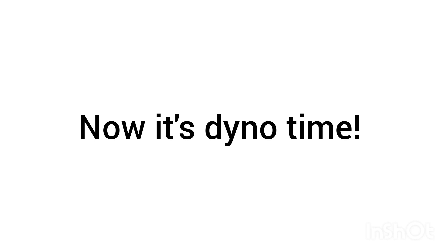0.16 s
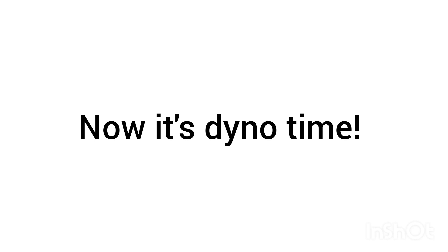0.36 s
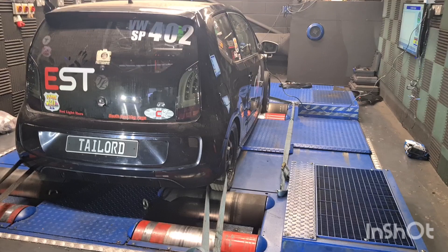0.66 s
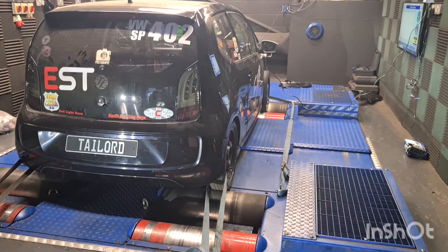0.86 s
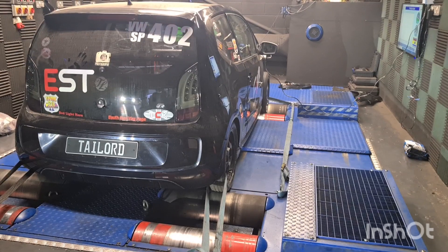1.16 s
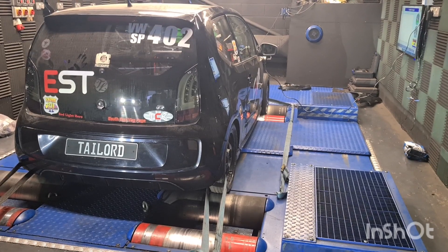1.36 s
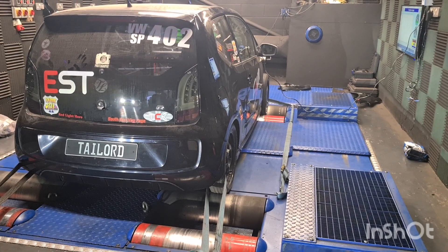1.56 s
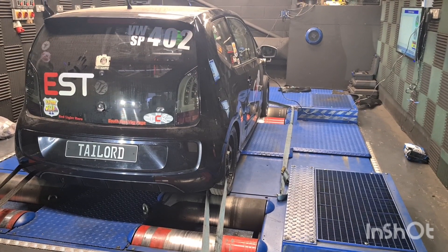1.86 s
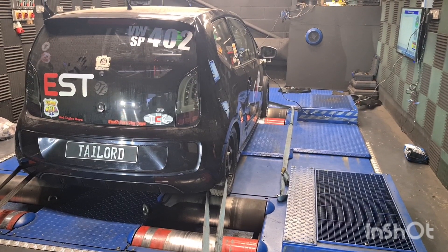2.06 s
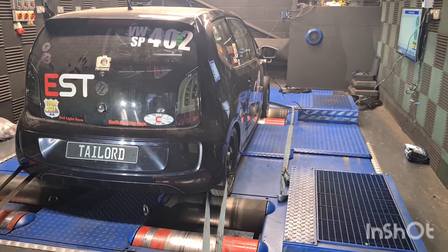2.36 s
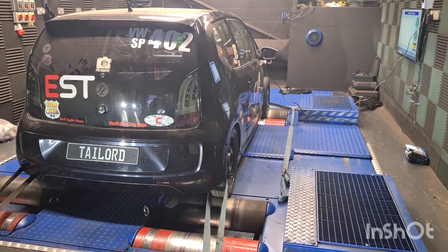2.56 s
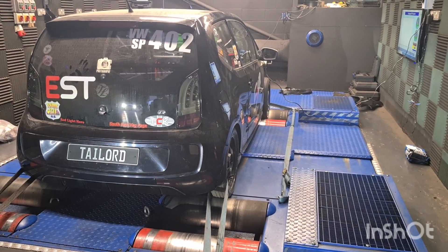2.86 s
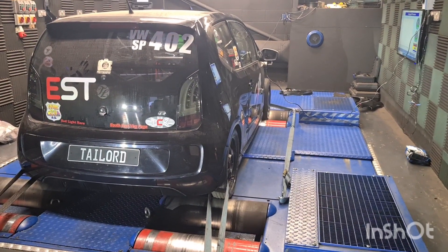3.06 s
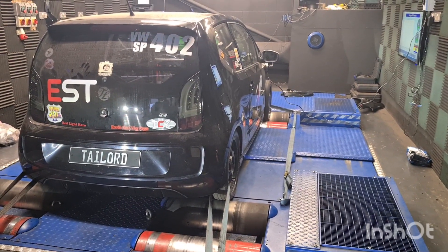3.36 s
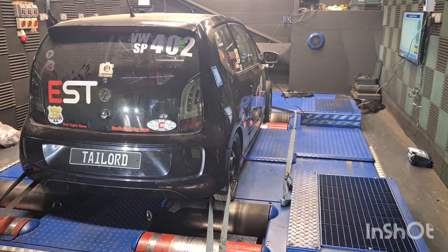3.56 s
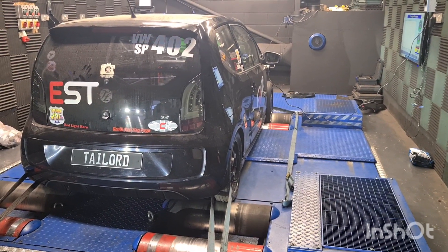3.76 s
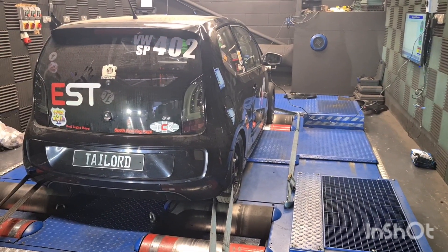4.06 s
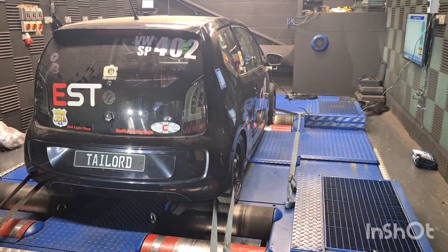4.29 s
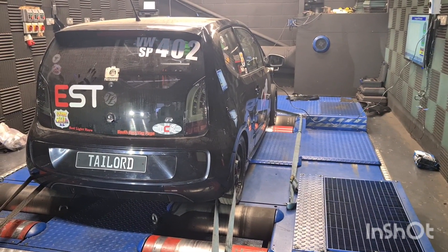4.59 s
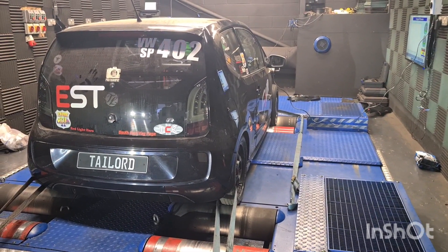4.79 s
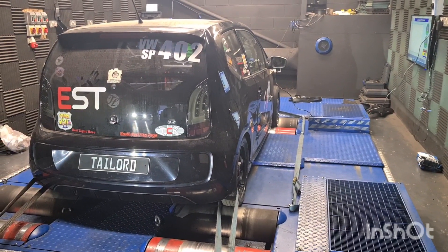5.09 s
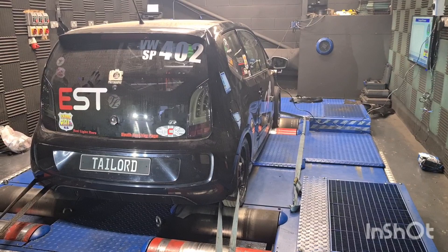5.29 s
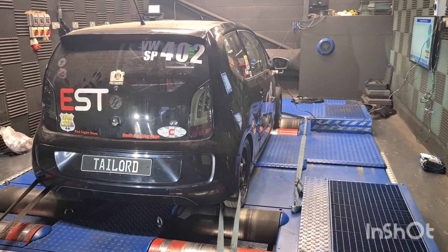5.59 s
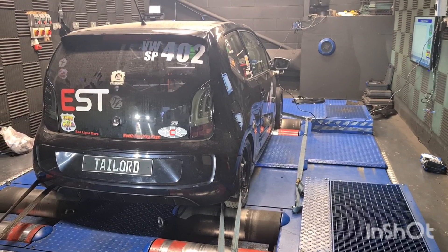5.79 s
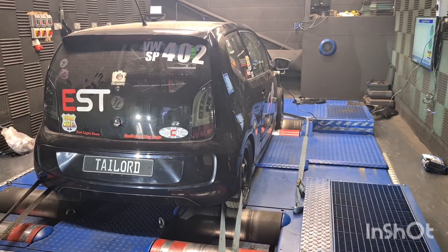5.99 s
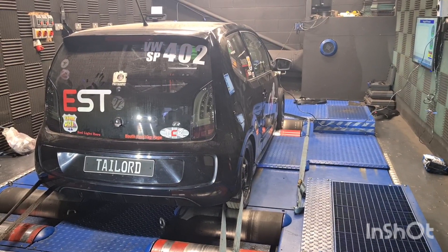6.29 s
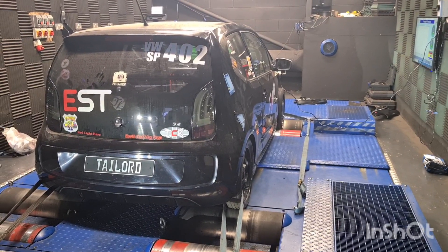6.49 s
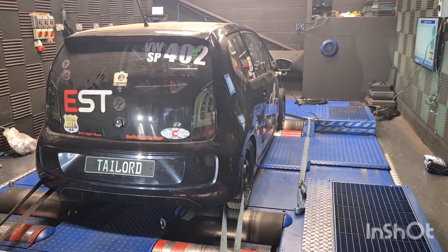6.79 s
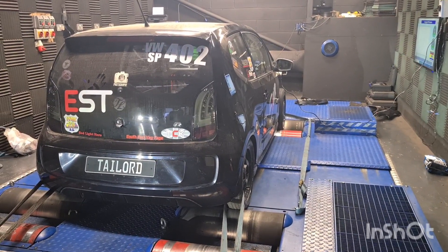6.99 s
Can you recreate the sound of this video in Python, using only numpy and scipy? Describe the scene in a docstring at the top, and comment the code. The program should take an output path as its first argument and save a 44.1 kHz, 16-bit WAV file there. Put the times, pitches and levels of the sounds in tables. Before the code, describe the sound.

After a brief silence, a turbocharged five-cylinder car roars in abruptly and pulls steadily up through its revs on rollers in a small test cell.

```python
"""Five-cylinder car on a rolling road

A turbocharged car pulls steadily up through its revs in a small test cell; the sound cuts in mid-run.
The exhaust is a sum of engine orders swept through the fixed peaks and nulls of pipe and room, so the
drone swells, hollows out and throbs. Shaped noise makes the tailpipe's puffs of gas, the hiss of fan and
tyres and a brief opening roar; a narrow noise band climbing in pitch is the faint turbo whistle."""
import sys
import numpy as np
from scipy import signal
from scipy.fft import rfft, irfft, next_fast_len
from scipy.io import wavfile
from scipy.ndimage import uniform_filter1d

SR = 44100
rng = np.random.default_rng(int(sys.argv[2]) if len(sys.argv) > 2 else 0)


def transcribe(u):
    """Save the signal u as a 16-bit wav file named by the first command-line argument.

    u: samples, shape (n,) or (channels, n), limited to [-1, 1]; the rate is SR.
    q: integer samples, one column per channel.
    """
    v = np.clip(np.atleast_2d(u).T, -1, 1)
    q = np.round(v * 32767).astype(np.int16)
    wavfile.write(sys.argv[1], SR, q)


N = 314874
TIME = np.arange(N) / SR
START_S = 0.6925   # silence before this


def from_db(db):
    """Decibel law: 20 dB is a factor of ten in amplitude."""
    return 10 ** (np.asarray(db) / 20)


def rms_one(x):
    """Power normalisation: scale to a mean square of one."""
    return x / np.sqrt(np.mean(x ** 2) + 1e-20)


def in_time(rows, t=TIME):
    """Linear interpolation: read each column of a time curve at the times t."""
    s, *columns = np.transpose(rows)
    return [np.interp(t, s, column) for column in columns]


def at_hz(points, hz):
    """Logarithmic frequency scale: read a spectrum in dB between its points."""
    point_hz, db = np.transpose(points)
    return np.interp(np.log(hz + 1e-6), np.log(point_hz), db)


def colour(x, points, share=1):
    """Zero-phase filtering: multiply the spectrum by a smooth curve in dB, or by a share of it."""
    size = next_fast_len(N + 4096)
    hz = np.arange(size // 2 + 1) * SR / size
    gain = from_db(share * at_hz(points, hz))
    return irfft(rfft(x, size) * gain, size)[..., :N]


def drift(rate):
    """Low-passed noise: a slow random curve of unit power, faster for a higher rate."""
    step = 40   # samples between computed points
    pole = np.exp(-2 * step * np.pi * rate / SR)
    noise = rng.standard_normal(N // step + 2002)
    slow = signal.lfilter([1], [1, -2 * pole, pole * pole], noise)[2000:]
    return np.interp(np.arange(N) / step, np.arange(len(slow)), rms_one(slow))


def stereo(mid, side):
    """Sum and difference: left and right from mid and side."""
    return np.array([mid + side, mid - side])


def white_noise(*shape):
    """Spectral density: white noise of unit power per hertz."""
    return rng.standard_normal(shape) * np.sqrt(SR / 2)


# Interaural difference of the air noise, side against mid: hz [Hz], side_to_mid_db [dB]
AIR_WIDTH = [(40, -20), (150, -5), (300, -11.5), (600, -12.5), (1000, -0.5), (2000, 2), (4500, -2.23),
             (12000, 0.7)]


def widen(side):
    """Interaural coherence: weaken the side signal in the bass, where the ears hear nearly alike."""
    return colour(side, AIR_WIDTH)


def wide_noise(spectrum):
    """Diffuse field: independent mid and side noise of a given density."""
    mid, side = colour(white_noise(2, N), spectrum)
    return stereo(mid, widen(side))


def reflections(x, t60):
    """Reverberation: convolve with a dense, exponentially dying cloud of echoes of unit energy."""
    t = TIME[:SR // 2]
    echoes = rng.standard_normal(len(t)) * from_db(-60 * t / t60)
    return signal.fftconvolve(x, echoes / np.linalg.norm(echoes))[:N]


def in_cell(spectrum, near_share, t60):
    """Direct and diffuse fields: wide noise, plus one near jet reaching each ear by its own echoes."""
    share = np.clip(near_share, 0, 1)   # of the power
    jet = colour(white_noise(N), spectrum)
    near = stereo(reflections(jet, t60), widen(reflections(jet, t60)))
    return np.sqrt(1 - share) * wide_noise(spectrum) + np.sqrt(share) * near


def resonate(x, table):
    """Second-order resonance: a chain of ringing peaks and narrow nulls."""
    hz, width_hz, db = np.transpose(table)
    angle, gain = 2 * np.pi * hz / SR, from_db(db / 2)
    half_width, middle = np.pi * np.abs(width_hz) / SR, -2 * np.cos(angle)
    zeros = [1 + half_width * gain, middle, 1 - half_width * gain]
    poles = [1 + half_width / gain, middle, 1 - half_width / gain]
    sections = np.array(zeros + poles) / poles[0]
    return signal.sosfilt(np.ascontiguousarray(sections.T), x)


def elapsed(t=TIME):
    """Time origin: seconds since the sound cut in."""
    return np.maximum(t - START_S, 0)


# the rollers let the revs climb at a constant rate; the engine starts a little behind and catches up
START_RPM, RAMP_RPM_PER_S, BEHIND_RPM, CATCH_UP_S = 1978, 290, 94, .2


def rpm(t=TIME):
    """Uniform acceleration: a steady ramp of engine speed after an exponential catch-up."""
    lag_rpm = BEHIND_RPM * np.exp(-elapsed(t) / CATCH_UP_S)
    return START_RPM + RAMP_RPM_PER_S * elapsed(t) - lag_rpm


def cycle_rate(t=TIME):
    """Four-stroke principle: one engine cycle for every two turns of the crank, per second."""
    return rpm(t) / 120


CYLINDERS = 5
# Unequal cylinders repeat one pattern along the orders; the rows are a firing order and the four above it:
# low_order_db [dB], set by cylinder strengths; high_order_db [dB], set by cylinder timing
CYLINDER_PATTERN = [(13, 3.5), (3.5, 2.5), (-0.5, -1.5), (-0.5, 6), (4, 1.5)]
PATTERN_TURN_ORDER = 17.55   # where the one gives way to the other
BELOW_FIRING_DB_PER_OCTAVE = 19.5   # the manifold evens out what is slower than the firing rate
CRANK_DB = 7   # unbalanced parts shake once for every turn of the crank


def order_db(k):
    """Fourier series: strength of the k-th multiple of the cycle rate, before the silencer."""
    if k == 2:
        return CRANK_DB
    low_db, high_db = CYLINDER_PATTERN[k % CYLINDERS]
    low_share = 1 / (1 + (k / PATTERN_TURN_ORDER) ** 8)
    pattern_db = high_db + (low_db - high_db) * low_share
    return pattern_db + BELOW_FIRING_DB_PER_OCTAVE * min(np.log2(k / CYLINDERS), 0)


# How the engine pulls: start_s [s], level_db [dB], bark_db [dB] extra in the upper orders,
# throb_db [dB] extra in the orders between the firing ones
LOAD = [(.7, -1.5, -0.5, -2.5), (.85, -3.5, 3, -5), (1.0, -0.5, -3.5, -3), (1.3, -4, -3.5, -1),
        (1.8, 0, -8.5, -2), (2.3, -0.5, 0.5, 0), (3.0, -0.4, -4.5, 2), (3.6, 2.5, 0, -1),
        (4.3, -1.6, -2.2, 0.5), (4.8, 0.3, 0.3, -0.5), (5.6, 2.5, 1.7, .5), (6.0, -2.3, 7.5, 3),
        (6.6, 0, 5.4, -1), (7.14, 0.5, 4, -3.5)]
# Broad colour of the silencer: hz [Hz], level_db [dB]
SILENCER = [(35, -79.0), (65, -60), (85, -37.5), (125, -36.5), (190, -25), (260, -42.5), (400, -32.5),
            (540, -35), (640, -43.5), (850, -54.5), (1100, -52), (1500, -64), (2200, -61)]


def exhaust(cycles, uneven=0.97, dispersion=.04, scatter=1.0, spread_db=2.5, rough_db=0.75,
            waver_db=5.0, count=84):
    """Harmonic synthesis: orders of the engine cycle add up; the upper ones bark with load and waver."""
    t = TIME[::256]
    speed, (level_db, bark_db, throb_db) = cycle_rate(t), in_time(LOAD, t)
    waver = waver_db * rms_one(uniform_filter1d(rng.standard_normal((count, len(t))), size=24))
    chances = rng.standard_normal((count, 2))
    out = np.zeros(N)
    for k, ((luck, lag), wobble_db) in enumerate(zip(chances, waver), 2):
        hz = k * speed
        upper = np.clip(np.log(hz / 200) / np.log(4), 0, 1)   # none at 200 Hz, full at 800 Hz
        between_firings = k % CYLINDERS > 0
        db = order_db(k) + at_hz(SILENCER, hz) + level_db
        db = db + (bark_db + wobble_db + spread_db * luck) * upper
        db = db + throb_db * between_firings
        # phase in radians: pipe and silencer draw each throb out, long waves last;
        # unequal runners shift the in-between orders
        smear = dispersion * k ** 2 + uneven * between_firings + scatter * lag * k / 20
        out += np.interp(TIME, t, from_db(db)) * np.cos(2 * np.pi * k * cycles + smear)
    return np.sqrt(2) * out * from_db(rough_db * drift(34))   # no two combustions are equal


# Wall echoes of the exhaust, their level by pitch: hz [Hz], level_db [dB]
ECHO_COLOUR = [(60, -17), (125, -21), (190, -23.5), (280, -8), (400, -10.5), (550, -3.5), (800, -5.5),
               (1500, -9)]


def echoed_exhaust(drone, echo_db=-3.5, t60=0.2):
    """Image sources: wall echoes break up the orders and spread them between the ears."""
    echoes = np.array([reflections(drone, t60), reflections(drone, t60)])
    mid, side = colour(echoes, ECHO_COLOUR)
    return stereo(drone + from_db(echo_db) * mid, side)


# Turbulent gas at the tailpipe: hz [Hz], density_db [dB per Hz]
RUSH = [(20, -87), (45, -60), (75, -64.5), (110, -62), (180, -57), (300, -57), (500, -51), (700, -60),
        (1100, -64), (1700, -71), (2400, -71.5), (3300, -74.5), (4500, -74), (8000, -104)]
RUSH_DB, RUSH_WANDER_DB, RUSH_WANDERS_PER_S = 0.1, 1.0, 5


def rush(cycles, throb=0.06, puff=0.32):
    """Jet noise: turbulence leaves in puffs, ten to a cycle, with the beat of the strongest cylinder."""
    gate = 1 + throb * np.cos(2 * np.pi * cycles) + puff * np.cos(2 * np.pi * 10 * cycles)
    level_db = RUSH_DB + RUSH_WANDER_DB * drift(RUSH_WANDERS_PER_S)
    return in_cell(RUSH, near_share=0.15, t60=0.39) * rms_one(gate) * from_db(level_db)


# Standing waves of tailpipe and cell, peaks and nulls: hz [Hz], width_hz [Hz], level_db [dB]
STANDING_WAVES = [(85.2, 13.5, 9.5), (113.3, 0.98, -26.5), (127.4, 23.2, 16.5), (136.7, 16.4, -12),
                  (157.06, 1.5, -13), (162.7, 9.8, 13), (168.55, 7.2, -23), (177.5, 11.8, 8.5),
                  (204.4, 1.27, -31.5), (225.7, 14.3, 9.5), (238, 19.5, -10), (257.7, 11.8, 13),
                  (265.1, 6.7, -7.5), (296.3, 9.8, -15), (303.3, 9.6, 14), (319.6, 7.1, 8.5),
                  (347.5, 17.4, -7), (368, 3.1, -8), (386.6, 3.8, 9.5), (424, 17, 2.5), (430.3, 1.6, -20),
                  (446.9, 6.3, 17), (448.5, 6.25, -20), (459, 2.7, -12), (476.2, 3.3, -13.5),
                  (499, 4, -6.5), (526.3, 39, 5.5), (552, 15.3, 7.5), (571, 7.2, -9), (578.4, 118, -10),
                  (825, 7.5, 13.5), (855, 5.4, 11.5), (1041.5, 32, 7.5), (1337, 21, 9.5)]


def pipe_and_cell(x):
    """Standing waves: fixed modes lift or cancel each order as it sweeps past."""
    return resonate(x, STANDING_WAVES)


# Fan, intake and tyres: hz [Hz], density_db [dB per Hz] before the overall level
HISS = [(300, -20), (1000, -1), (1700, 0), (2200, -6), (2700, -5), (3300, -1.5), (5300, 0.5), (6600, -5.5),
        (9200, -9.5), (11000, -15.5), (12300, -13.5), (13600, -24), (15700, -31)]
HISS_DB, HISS_RISE_DB_PER_S = -63.5, 0.1853   # the hiss grows a little through the pull
HISS_TOP_DB, TOP_FALL_DB_PER_S = -2.4, 0.04   # its top octave, against the rest


def air(cycles, flutter_db=.5, throb=0.021, split_hz=7500):
    """Broadband flow noise: steady hiss of fan and tyres, lightly shaken by the engine."""
    noise = in_cell(HISS, near_share=.4, t60=.07)
    high_pass = signal.butter(2, split_hz, "high", fs=SR, output="sos")
    top = signal.sosfiltfilt(high_pass, noise)
    noise = noise + top * (from_db(HISS_TOP_DB - TOP_FALL_DB_PER_S * elapsed()) - 1)
    level_db = HISS_DB + HISS_RISE_DB_PER_S * elapsed() + flutter_db * drift(20)
    return noise * from_db(level_db) * (1 + throb * np.cos(2 * np.pi * cycles))


# Roar as the throttle opens: hz [Hz], density_db [dB per Hz] before the overall level
SURGE = [(60, -70), (120, -43), (200, -43.5), (310, -52), (450, -62), (800, -65), (1300, -62.5),
         (2300, -67), (3200, -70.5), (5000, -68), (9000, -87.5)]
# it swells quickly, holds, and dies away as the boost builds
SURGE_DB, SURGE_ATTACK_S, SURGE_HOLD_S, SURGE_FALL_DB_PER_S = 2.5, 0.01, 0.42, 42


def surge(cycles, throb=0.16):
    """Amplitude-modulated noise: a rough gulp of air, shaken at the engine's cycle."""
    swell = 1 - np.exp(-elapsed() / SURGE_ATTACK_S)
    level_db = SURGE_DB - SURGE_FALL_DB_PER_S * np.maximum(elapsed() - SURGE_HOLD_S, 0)
    return wide_noise(SURGE) * swell * from_db(level_db) * (1 + throb * np.cos(2 * np.pi * cycles))


# Fine ripple from near walls and body panels: hz [Hz], width_hz [Hz], level_db [dB]
WALLS = [(613, 11, 3.5), (594, 24, 0), (741, 17, -8.5), (753, 46, 8.5), (809, 5.9, 6.5), (818, 13, -5.5),
         (921, 3, -3), (990, 11, 4.5), (1065, 6.4, 4), (1090, 33, -6), (1330, 27, -2.5), (1400, 14, -1),
         (1560, 99, -4), (1666, 19, 3), (1700, 56, 0.2), (1965, 110, -4.5), (2100, 20, 2.5), (2150, 17, 4),
         (2510, 69, -5), (3030, 48, -7), (3250, 30, 0), (3930, 470, -2.5), (5040, 99, -4.5),
         (5300, 250, -2.5)]


def near_walls(x):
    """Interference: early reflections ripple the spectrum of exhaust, hiss and roar."""
    return resonate(x, WALLS)


# the turbo spools towards its top speed and its whistle fades into the hiss
TURBO_START_HZ, TURBO_TOP_HZ, SPOOL_S = 2302, 7030, 4.3
TURBO_DB, TURBO_FADE_DB_PER_S = -37.5, 1.6


def turbo(width_hz=170):
    """Quadrature modulation: low-passed noise moved up to a climbing pitch is a faint breathy whistle."""
    hz = TURBO_TOP_HZ - (TURBO_TOP_HZ - TURBO_START_HZ) * np.exp(-elapsed() / SPOOL_S)
    low_pass = signal.butter(2, width_hz, fs=SR, output="sos")
    blur = signal.sosfilt(low_pass, rng.standard_normal((2, 2, N)))
    turn = 2 * np.pi * np.cumsum(hz) / SR
    whistle = rms_one(blur[0] * np.cos(turn) + blur[1] * np.sin(turn))
    return whistle * from_db(TURBO_DB - TURBO_FADE_DB_PER_S * elapsed())


# Left ear against right: hz [Hz], left_to_right_db [dB]
LEAN = [(60, 6), (110, -3), (200, 0.5), (380, -3.5), (700, 0), (1290, -3.0), (2380, -5.5), (4400, -1),
        (8120, 0.5), (15000, -3)]
RIGHT_LATE_S = 9e-5   # the car stands a little to the left


def place(left, right):
    """Interaural time and level differences: delay the right ear and split the level curve in two."""
    right = np.interp(TIME - RIGHT_LATE_S, TIME, right)
    return np.array([colour(left, LEAN, 1 / 2), colour(right, LEAN, -1 / 2)])


def scene():
    """Superposition: one engine phase drives every pulsing layer, and the layers add."""
    cycles = np.cumsum(cycle_rate()) / SR
    drone = exhaust(cycles)
    tailpipe = echoed_exhaust(drone) + rush(cycles)
    body = pipe_and_cell(tailpipe) + air(cycles) + surge(cycles)
    left, right = near_walls(body) + turbo()
    return place(left, right)


CUTOFF_HZ = 15520


def record(dry):
    """Saturation and band limiting: a sudden start, rounded peaks and a steep treble cut."""
    rounded = 1.3 * np.tanh(dry / 1.3)
    live = rounded * np.clip((TIME - START_S) / .004, 0, 1)
    return signal.sosfilt(signal.ellip(12, .1, 90, CUTOFF_HZ, fs=SR, output="sos"), live)


dry = scene()
out = record(dry)
transcribe(out)
```